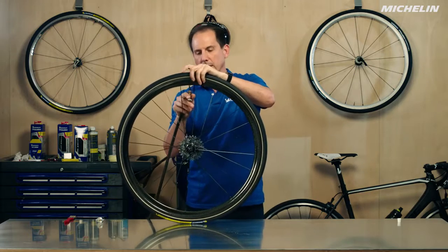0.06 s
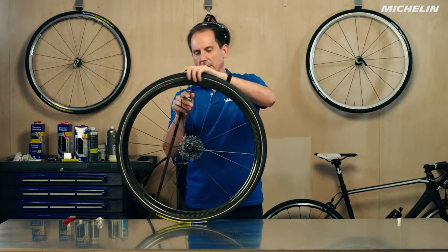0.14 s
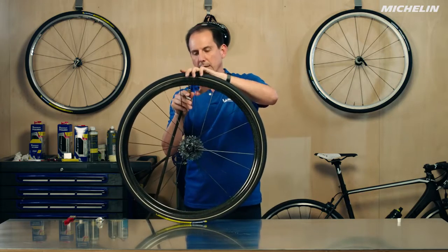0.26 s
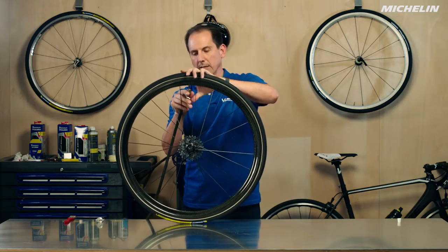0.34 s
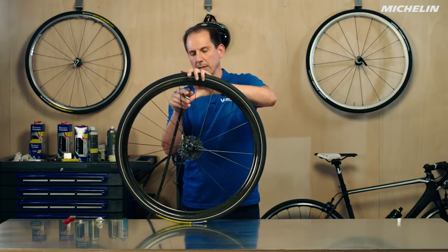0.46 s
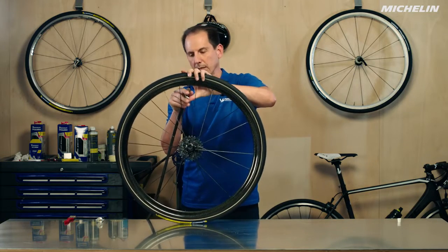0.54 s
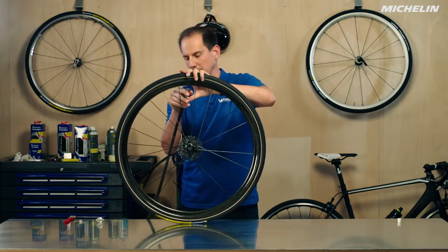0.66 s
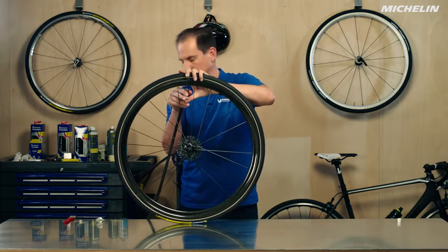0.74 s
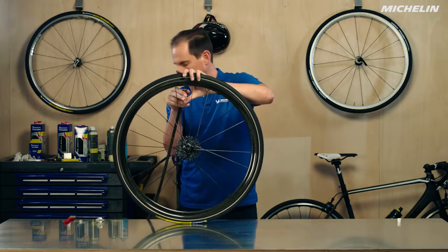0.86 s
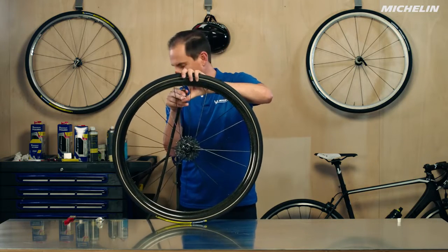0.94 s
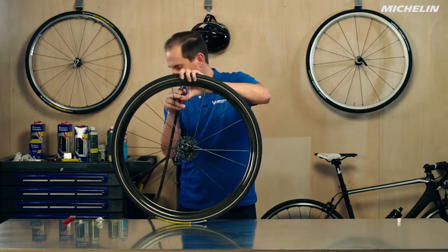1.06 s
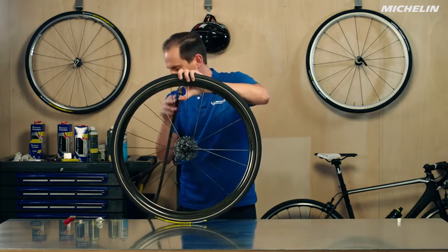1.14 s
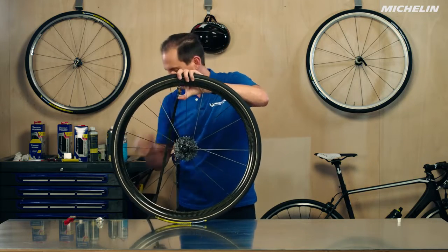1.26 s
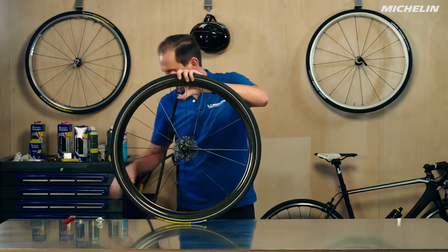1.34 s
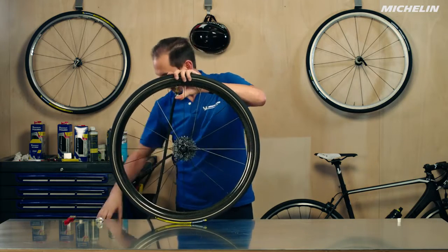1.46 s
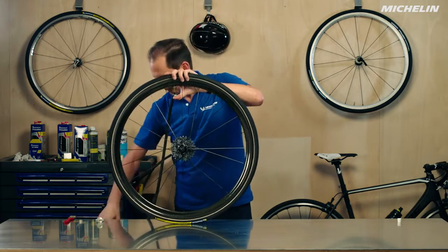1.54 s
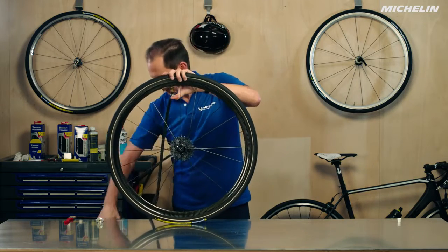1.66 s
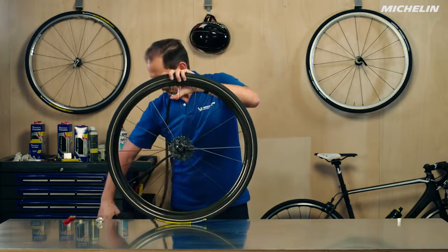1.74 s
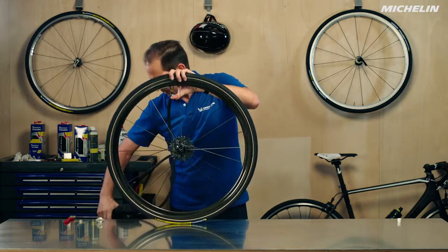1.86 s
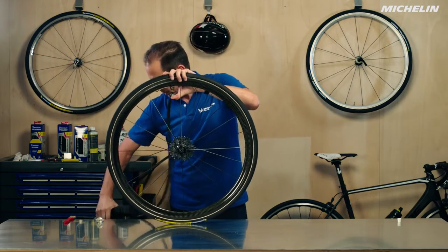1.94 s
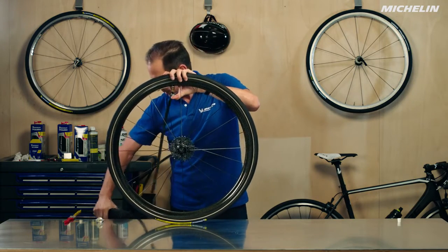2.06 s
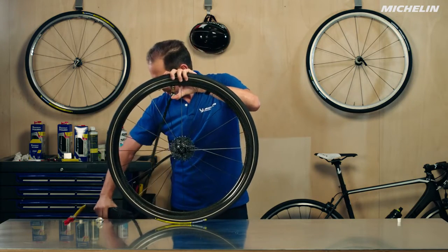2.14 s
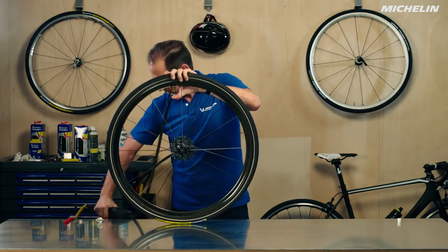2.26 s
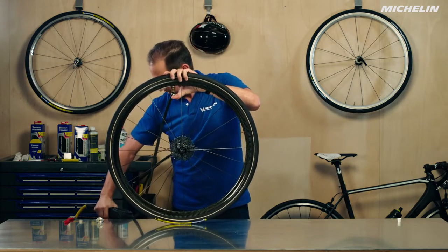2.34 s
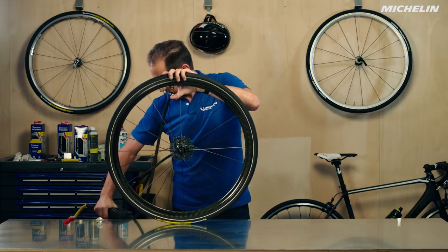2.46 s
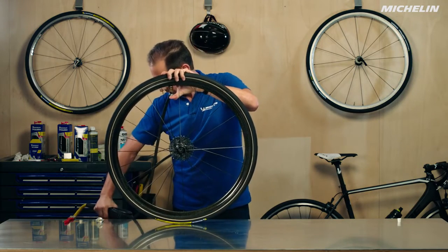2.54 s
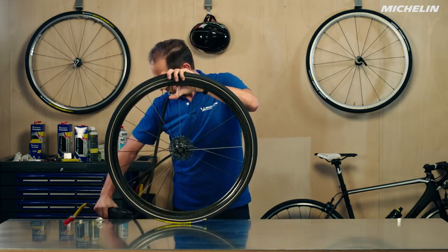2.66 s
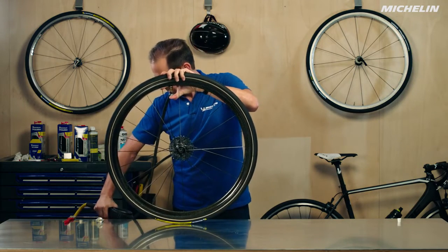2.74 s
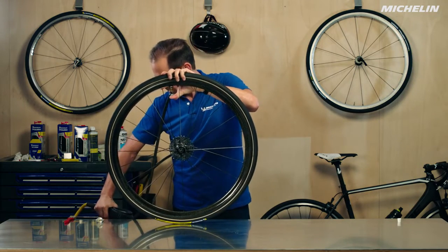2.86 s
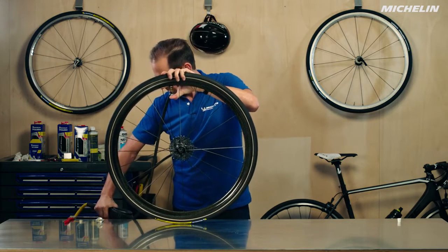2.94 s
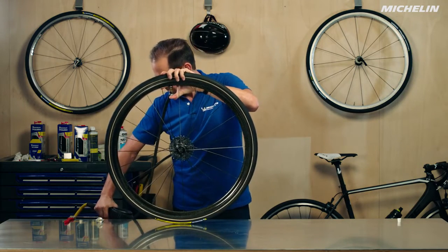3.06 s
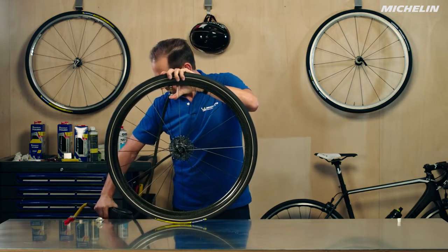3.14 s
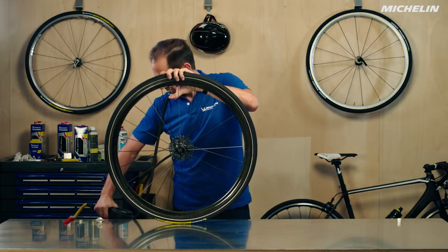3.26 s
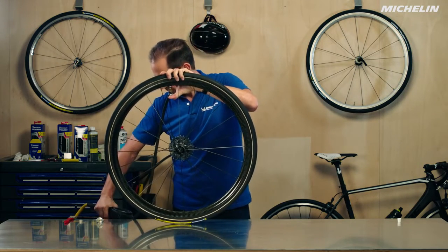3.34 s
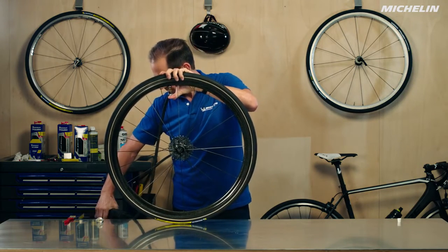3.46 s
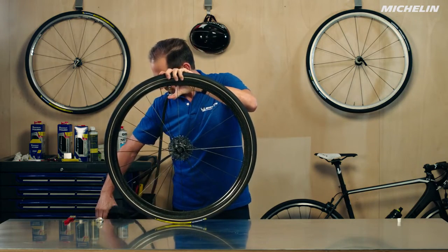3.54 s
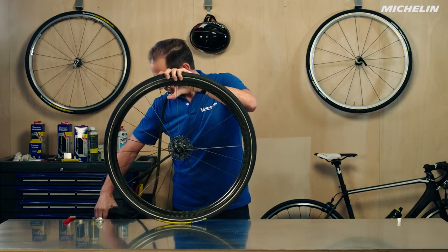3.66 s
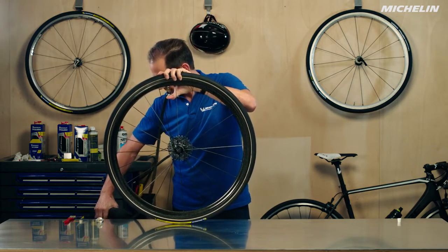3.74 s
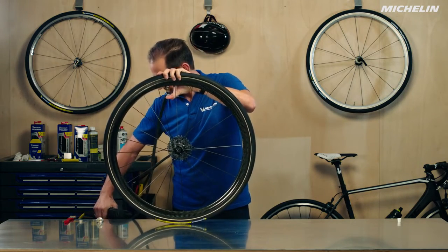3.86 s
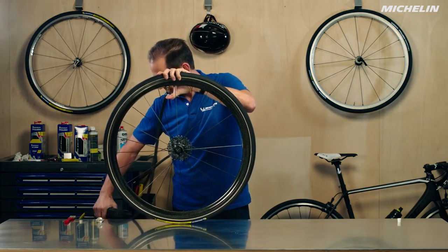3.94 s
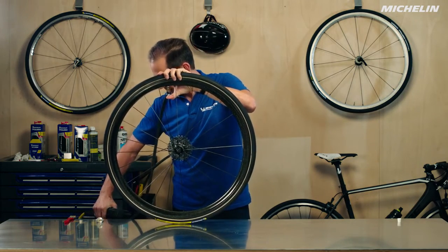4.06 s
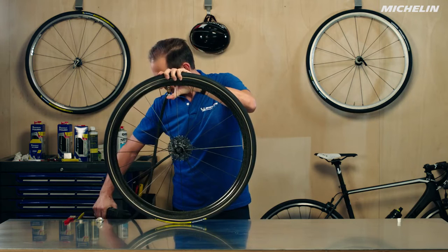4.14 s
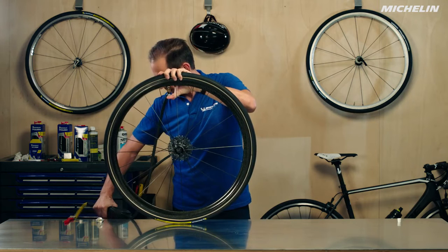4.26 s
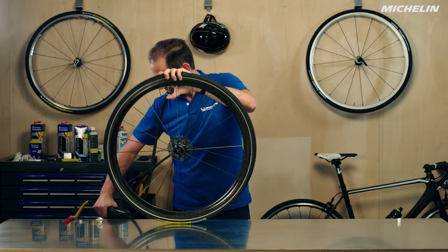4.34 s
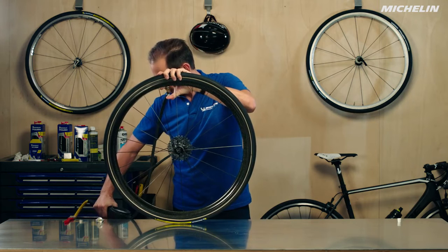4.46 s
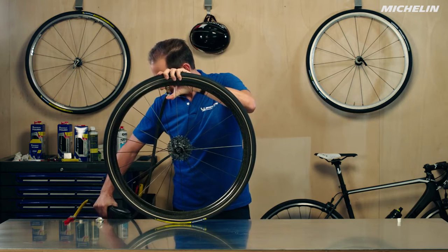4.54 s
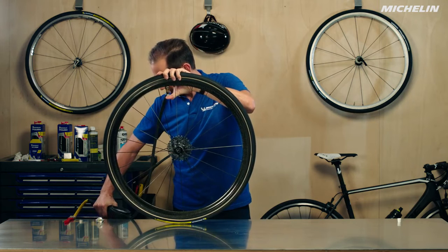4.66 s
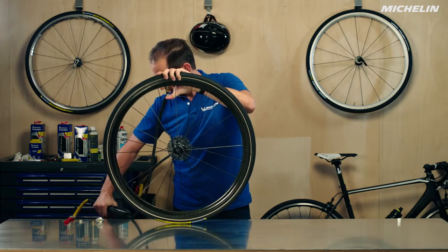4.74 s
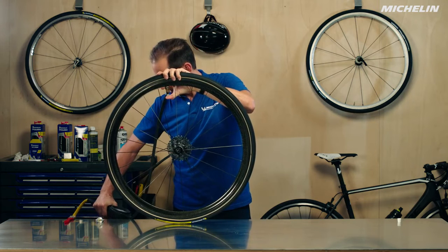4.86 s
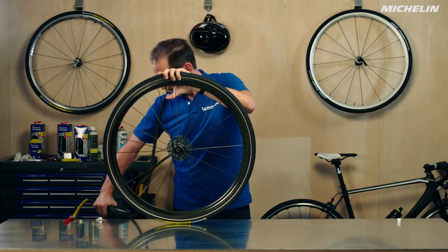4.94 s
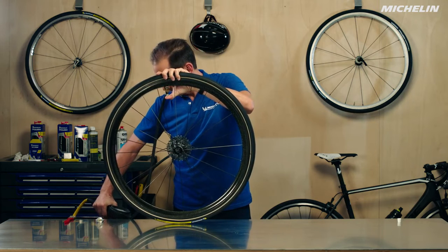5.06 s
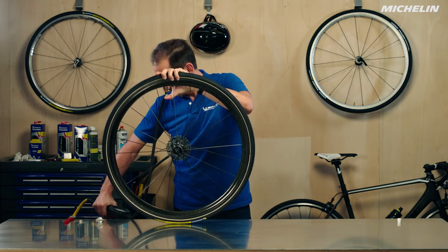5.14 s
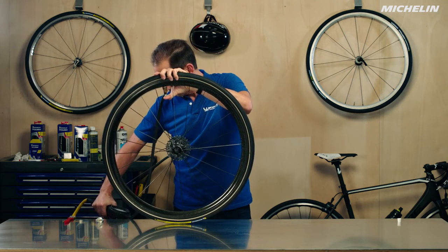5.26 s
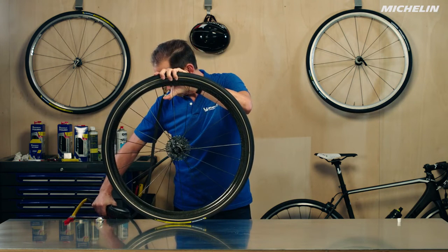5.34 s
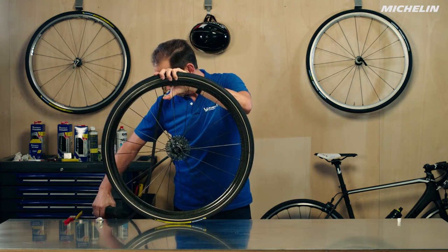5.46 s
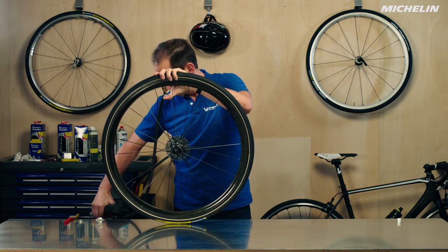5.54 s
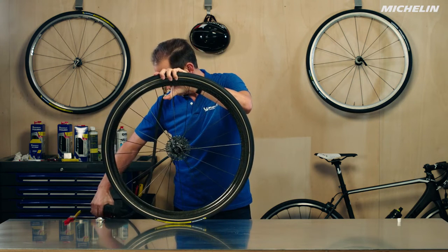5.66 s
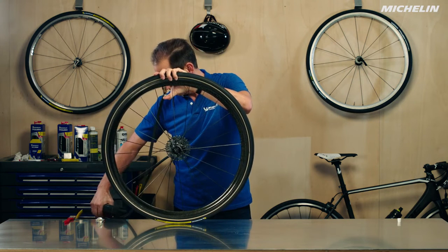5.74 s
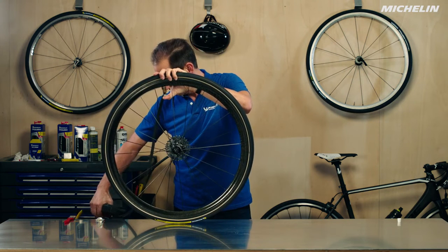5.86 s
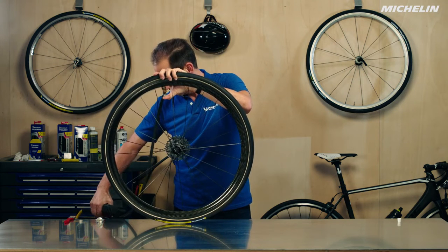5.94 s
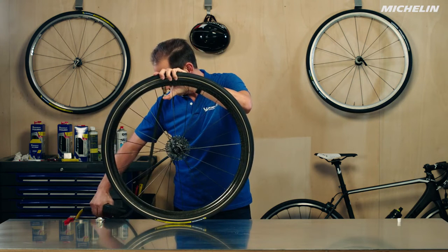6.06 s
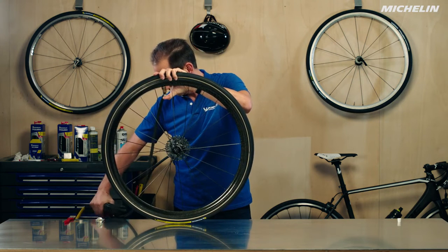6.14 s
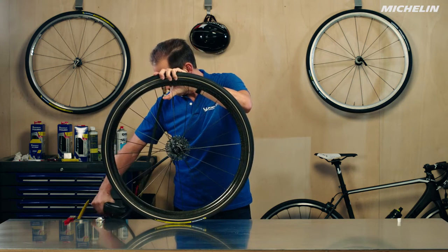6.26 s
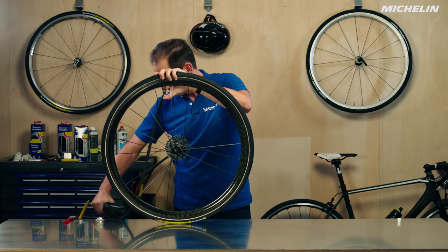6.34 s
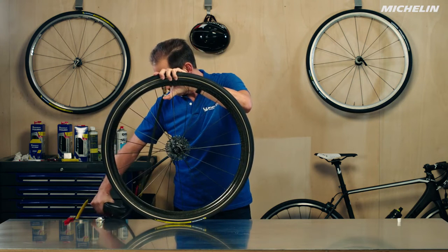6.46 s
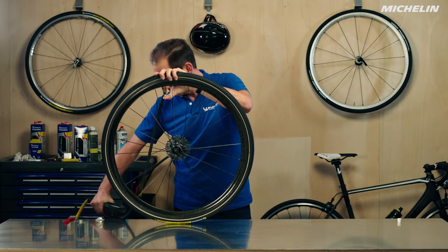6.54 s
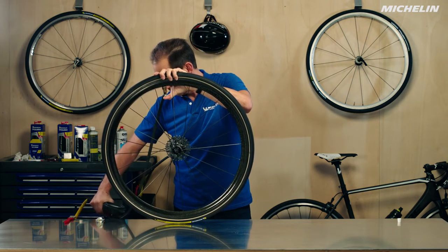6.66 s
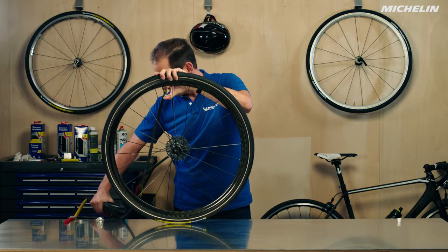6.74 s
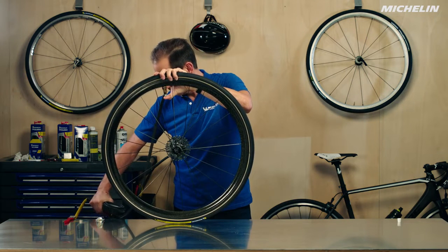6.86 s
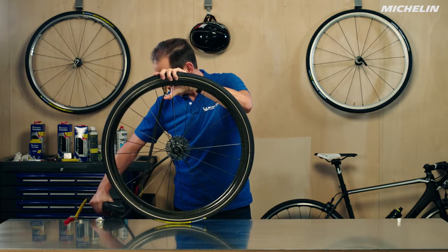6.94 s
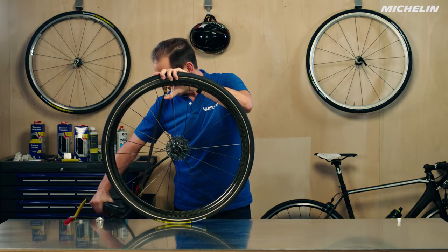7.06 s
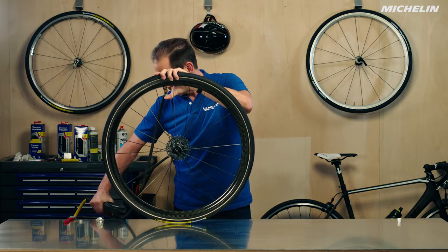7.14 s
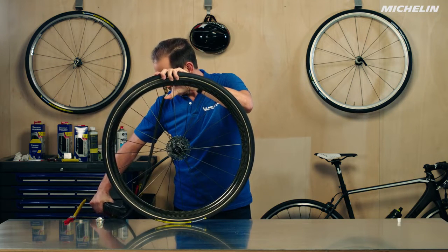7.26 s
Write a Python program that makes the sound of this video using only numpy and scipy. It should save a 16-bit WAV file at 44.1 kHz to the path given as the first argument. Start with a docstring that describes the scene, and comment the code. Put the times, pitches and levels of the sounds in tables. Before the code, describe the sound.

A pump head clicks and scuffs onto a bicycle tyre valve, spitting thin air early on. A short hollow intake and piston knocks lead to a long, bright, hollow rush through the hose. Two stronger intakes follow, each ending in chirps, knocks and a loud pop, then fading hiss. Close single microphone, small quiet workshop with faint hum and rumble.

```python
"""In a small workshop with mains hum and low rumble, turbulence hisses and sputters as a pump goes on a tyre valve.
The struck chuck and its lever tick as damped modes, fingers brush, and the wheel rings faintly. Three pump strokes
follow: each lift draws turbulent air through the resonant barrel, the rod rubs, the seal chirps, the piston knocks.
Each push drives a jet through the hose, a comb of standing waves (long at first, then brief), and the valve pops.
After the second and third pops air hisses through the valve; after the second an edge tone also glides down."""
import sys
import numpy as np
from scipy import signal
from scipy.fft import rfft, irfft
from scipy.io import wavfile
from scipy.ndimage import uniform_filter1d

SR = 44100
rng = np.random.default_rng(int(sys.argv[2]) if len(sys.argv) > 2 else 0)


def bounce(signal):
    """Save signal as a 16-bit WAV file at the path given by the first command-line argument."""
    frames = np.transpose(np.atleast_2d(signal))
    limited = np.clip(frames, -1, 1)
    pcm = np.round(limited * 32767).astype(np.int16)
    wavfile.write(sys.argv[1], SR, pcm)


N = 321797
T = np.arange(N) / SR  # time [s]
HZ = np.fft.rfftfreq(2 ** 19, 1 / SR)  # frequencies of the long spectra [Hz]

# All levels are relative: the gain of each layer and the room act after them.
# Spectra of the rumble and of the still air: (frequency [Hz], level [dB])
RUMBLE_SPECTRUM = [(22, 1), (33, 1.5), (45, -8), (60, -5.5), (80, -16), (120, -23), (250, -28), (500, -43),
                   (900, -65)]
AIR_SPECTRUM = [(70, -3), (130, -13.5), (230, -17), (400, -18.5), (600, -20.5), (1200, -28.5),
                (3000, -37.5), (8000, -41.5), (16000, -44.5)]
# Mains harmonics and one other steady tone: (frequency [Hz], level [dB])
HUM_TONES = [(100, -49), (172, -56.5), (200, -48), (300, -61), (400, -65)]
# Swells of low rumble: (middle [s], half length [s], level [dB])
RUMBLE_SWELLS = [(1.033, 0.12, -45), (2.87, 0.035, -36), (3.62, 0.52, -27), (5.05, 0.25, -32),
                 (6.017, 0.21, -35)]
RUMBLE_REST_DB, RUMBLE_LUMPS_DB = -45.5, 1.7  # level between the swells, and rms unevenness

# Ticks of the chuck and its lever: (time [s], level [dB], treble snap [dB], pitch factor [1])
CHUCK_TICKS = [(0.124, -27.5, 15, 0.92), (0.392, -36, -2, 1.04), (0.572, -28, 3, 0.99), (0.795, -37, 1, .9),
               (1.111, -39, -15, 0.69), (1.142, -32.5, -1, 1.05), (1.16, -27.5, -5, 0.965),
               (2.01, -23, -30, 0.9)]
# Modes of the chuck: (frequency [Hz], level [dB], t60 [s])
CHUCK_MODES = [(1410, -12, 0.036), (1876, 3.5, 0.016), (2150, -2, 0.029), (4400, -11, 0.0087),
               (6500, -21, 0.011)]
# Spectrum of the bright scuff of skin and metal: (frequency [Hz], level [dB])
SCUFF_SPECTRUM = [(700, -22), (1300, -1), (1900, 0), (3500, -3.5), (6800, 7), (10000, -6), (13000, -10),
                  (16000, -16)]

# Air escaping as the chuck goes on: (start [s], length [s], thin hiss [dB], sputter [dB])
CHUCK_LEAKS = [(0.128, 0.129, -25.5, -55), (0.242, 0.06, -19, -36.5)]
# Spectra of the thin hiss and of the sputter: (frequency [Hz], level [dB])
LEAK_SPECTRUM = [(4500, -22), (5800, -14), (6900, -8), (8500, -8.5), (11300, -2.5), (14000, -4),
                 (16000, -1)]
SPUTTER_SPECTRUM = [(400, 2), (700, 4), (1200, 0), (2000, 1), (3000, -5.5), (4500, 1), (6000, -10),
                    (9000, -26), (14000, -29)]
SPUTTER_S = 0.02  # the sputter comes at the end of a leak, as the seal closes

# Fingers brushing chuck and rim: (start [s], length [s], level [dB])
FINGER_BRUSHES = [(0.897, 0.058, -60), (1.137, 0.018, -51), (1.206, 0.051, -56)]
# Faint ring of the wheel: (frequency [Hz], level [dB], t60 [s])
WHEEL_MODES = [(1800, -56, .6), (9500, -63, .45), (12300, -63, .6)]

# Air sucked in on the lifts: (start [s], length [s], level [dB], sag [dB/s], low-pass cutoff [Hz])
LIFT_DRAUGHTS = [(1.663, 0.062, -28, 122, 1410), (1.798, 0.12, -32, 85, 1420), (3.683, 0.67, -28, 74, 4930),
                 (5.67, 0.45, -27, 89, 5000)]
# Spectrum of the intake turbulence: (frequency [Hz], level [dB])
INTAKE_SPECTRUM = [(120, -4), (220, -5.5), (350, -7), (550, -7.5), (900, -11), (1200, -6.5), (1750, -8),
                   (2200, -19.5), (3000, -29.5), (7000, -27), (10000, -36)]
# Resonances of the barrel, then its two longest rings: (frequency [Hz], width [Hz], level [dB])
BARREL_RESONANCES = [(454, 28, -2), (644, 10, 7), (794, 45, 4.5), (880, 25, 0.5), (998, 53, -2),
                     (1350, 160, -3.5)]
BARREL_RINGS = [(866, 19, -3.5), (1017, 12.5, -3.5)]
BARREL_DB, BARREL_SAG_SHARE = -14.5, 0.49  # the barrel's notes outlast the draught
# The barrel also sounds softly as the piston goes down
PUSH_DRAUGHT_DB, PUSH_GROWTH_DB_PER_S, PUSH_NOTES_DB = -52.5, 5.5, -47.5

# The rod sliding: (start [s], length [s], level [dB])
ROD_SLIDES = [(1.669, 0.02, -36.5), (1.819, 0.029, -28), (5.997, 0.059, -44), (6.127, 0.027, -32.5)]
# Spectrum of the rubbing: (frequency [Hz], level [dB])
SLIDE_SPECTRUM = [(400, -17), (650, -11), (840, -6.5), (1100, -5.5), (1300, 0), (1550, -5), (1800, -1),
                  (3000, -6), (4000, -11.5), (6900, -15.5), (15000, -35.5)]
SLIDE_COAST_DB, SLIDE_COAST_S = -12, 0.11  # each slide trails off softly

# The seal slipping: (middle [s], level [dB], mean pitch [Hz], length [s])
SEAL_CHIRPS = [(1.704, -27, 409, 0.011), (1.789, -27, 789, 0.011), (1.812, -23, 824, 0.0082),
               (4.33, -8, 5530, 0.0021), (4.3383, -13, 5410, 0.0058), (6.2547, -10, 5460, 0.0019),
               (6.262, -19.5, 5400, 0.017), (6.272, -10.5, 4650, 0.0018)]
OVERTONE_RATIO, OVERTONE_DB = 1.383, 2  # a hard slip also rings a second mode of the seal

# The piston knocking: (time [s], level [dB], treble snap [dB], pitch factor [1], rebound re knock [dB])
PISTON_KNOCKS = [(2.108, -8.5, -10, 1.18, -22), (2.129, -15, 3, 0.96, -14), (3.548, -15.5, -5, 0.88, -0.5),
                 (4.345, -15, 5, 0.925, -7), (4.39, -12.5, 2, 0.77, -7), (5.524, -15.5, -11, 0.857, -3.5),
                 (5.542, -17, 1, 1.03, -23), (6.27, -18, 9, 0.95, -15)]
# Modes of the piston: (frequency [Hz], level [dB], t60 [s])
PISTON_MODES = [(900, -23, 0.088), (1141, 1.5, 0.028), (1323, -8, 0.029), (1930, -6.5, 0.013),
                (2810, -20, 0.013), (4430, -17, 0.012)]
# Spectrum of the crack of a knock: (frequency [Hz], level [dB])
CRACK_SPECTRUM = [(300, -28), (1000, 3), (3000, 6.5), (5000, 10.5), (6800, 3), (8500, -6), (15000, -20)]
REBOUND_S, REBOUND_SNAP_DB, REBOUND_PITCH = 0.0083, 9, 0.993  # every knock bounces once

# Air rushing into the hose: (start [s], length [s], jet [dB], hollow body of the pump [dB])
HOSE_FILLS = [(2.171, 1.408, -16, -20.5), (4.332, 0.063, -23.5, -27.5), (6.258, 0.028, -24.5, -26.5)]
# Spectra of the jet and of the hollow body: (frequency [Hz], level [dB])
JET_SPECTRUM = [(3500, -15.5), (4600, -7), (5600, -6), (6600, 2.5), (7800, 4.5), (8400, -1), (10100, 0.5),
                (10900, -3), (12400, 2.5), (13100, -8.5), (15800, -5)]
BODY_SPECTRUM = [(500, -24), (750, -29.5), (1000, -6.5), (1500, -3), (2000, 1.5), (2400, 4.5), (2800, 1.5),
                 (3300, 0), (4000, -7.5), (5000, -15), (7000, -41)]
FILL_HOLD_S, FILL_SAG_DB_PER_S = 0.23, 11.5  # the rush holds, then sinks as back pressure builds
HOLLOW_BUILD_S = 0.026  # time constant of the hollow sound swelling in behind the jet
HOSE_HZ = 172.4  # lowest standing wave of a metre of hose

# The tyre valve popping open: (time [s], level [dB], treble snap [dB], pitch factor [1])
VALVE_POPS = [(2.2245, -8.5, 1.5, 0.95), (4.3843, 2, 3, 0.98), (6.305, 3, 2, 1)]
# Modes of the valve: (frequency [Hz], level [dB], t60 [s])
VALVE_MODES = [(824, -15, 0.018), (1151, -10.5, 0.062), (1907, 0.5, 0.029), (2230, -15, 0.015),
               (3240, -12.5, 0.018), (4330, -6.5, 0.013), (12700, -37, 0.024)]
# Spectrum of the air released by a pop: (frequency [Hz], level [dB])
BURST_SPECTRUM = [(550, -41.5), (900, 3), (1450, -9), (2100, 18), (3000, -1.5), (4300, 9), (5500, -3),
                  (8000, -2.5), (15000, -8)]

# Air passing the open tyre valve: (start [s], length [s], level [dB], sag [dB/s])
VALVE_FLOWS = [(4.418, 1.1, -31, 8.5), (6.352, 0.95, -37, 16)]
# Spectrum of that flow: (frequency [Hz], level [dB])
FLOW_SPECTRUM = [(300, -39), (900, -16.5), (1400, -11.5), (2400, -11.5), (3400, -14.5), (4400, -13.5),
                 (5400, -17.5), (6500, -13.5), (10200, -16.5), (14000, -18), (15500, -26.5)]
# Resonances of the valve passage: (frequency [Hz], width [Hz], level [dB])
FLOW_RESONANCES = [(7294, 570, 1.5), (8900, 430, -6.5), (12060, 830, -6)]

# The valve's whistle sinks as the pressure evens out: (time [s], mean pitch [Hz])
WHISTLE_GLIDE = [(4.47, 5100), (4.65, 4900), (4.79, 4680), (5.08, 4320), (5.12, 4170), (5.5, 3830)]
# Partials gliding through a resonance: (multiple [1], level [dB], resonance [Hz], width [Hz])
WHISTLE_MODES = [(1, -46, 4700, 420), (3, -46, 14200, 750), (3, -42, 12350, 650)]

# Reverberation of the room: (frequency [Hz], t60 [s])
ROOM_DECAY = [(200, 1), (1000, 0.69), (2200, 0.63), (5000, 0.51), (8000, 0.4), (15000, 0.13)]
# Reflections from bench, floor and wall: (delay [s], level [dB])
NEAR_ECHOES = [(.0028, -14), (.0046, -15), (.0071, -11), (.0083, -14), (.0118, -21)]
EDGE_HZ = 15900  # upper band limit


def amp(db):
    """Level to amplitude: 20 dB is a factor of ten."""
    return 10 ** (np.asarray(db) / 20)


def evened(x):
    """Normalization to unit root-mean-square."""
    return x / np.sqrt(np.mean(x ** 2) + 1e-20)


def read(points, hz):
    """Linear interpolation of a spectrum over log frequency."""
    f, value = np.transpose(points)
    return np.interp(np.log(hz + 1), np.log(f + 1), value)


def add(mix, s, sound):
    """Superposition: a sound is summed into the mix from time s."""
    part = mix[max(round(s * SR), 0):][:len(sound)]
    part += sound[:len(part)]


def noise(colour, rings=()):
    """Turbulence as filtered white noise: a broad spectrum plus resonances, steeply high-passed below."""
    low_cut = 1 + (0.22 * colour[0][0] / (HZ + 1)) ** 4
    power = amp(read(colour, HZ)) ** 2 / low_cut
    for hz, width, db in rings:
        power = power + amp(db) ** 2 / (1 + ((HZ - hz) / width) ** 2 * 2) ** 2
    white = rng.standard_normal(2 * len(HZ) - 2)
    return evened(irfft(rfft(white) * np.sqrt(power))[:N])


def waver(per_s):
    """Low-pass random fluctuation of unit rms, up to about per_s changes a second."""
    white = rng.standard_normal(N)
    return evened(signal.sosfilt(signal.butter(2, per_s, fs=SR, output="sos"), white))


def gust(start, length, db, rise, fall, sag_db_per_s=0, hold=0):
    """Gain of one rush: exponential onset up to the start, hold, steady sag in dB, exponential decay at the end."""
    t = T - start
    outside = np.maximum(-t, 0) / rise + np.maximum(t - length, 0) / fall
    level = db - sag_db_per_s * np.clip(t - hold, 0, length)
    return amp(level) * np.exp(-np.minimum(outside, 20))


def strikes(events, modes, colour, snap_db, snap_s):
    """Modal impact: each blow excites damped sinusoids and a brief snap of noise."""
    out, t = np.zeros(N), T[:SR // 4]
    snaps = noise(colour)
    for k, (s, db, treble_db, pitch) in enumerate(events):
        detune = pitch * (1 + rng.uniform(-.015, .015, len(modes)))
        ring = np.zeros(len(t))
        for d, (hz, level, t60) in zip(detune, modes):
            ring += amp(level - 60 * t / t60) * np.sin(2 * np.pi * hz * d * t)
        snap = snaps[k * len(t):][:len(t)] * np.exp(-t / snap_s)
        add(out, s, amp(db) * (.5 * ring + amp(snap_db + treble_db) * snap))
    return out


def churn(x, patchy_db):
    """Intermittency of turbulence: patches a few hundred Hz wide and about 0.1 s long rise and fall."""
    z = signal.stft(x, SR, nperseg=512)[2]
    patches = uniform_filter1d(rng.standard_normal(z.shape), size=4, axis=0)  # across frequency
    patches = evened(uniform_filter1d(patches, size=16, axis=1))  # along time
    return evened(signal.istft(z * amp(patchy_db * patches), SR, nperseg=512)[1][:N])


def standing_waves(x, reflection):
    """Repeated reflection along the hose: evenly spaced resonances that blur in the treble."""
    kept = np.clip(reflection, 0, .8) / (1 + (HZ / 2200) ** 2)
    round_trip = kept * np.exp(-2j * np.pi * HZ / HOSE_HZ)
    return evened(irfft(rfft(x, 2 * len(HZ) - 2) / (1 - round_trip))[:N])


def background():
    """Steady sinusoids with slow phase wander for the hum; stationary noise for air and swelling noise for rumble."""
    hum = np.zeros(N)
    for hz, db in HUM_TONES:
        cycles = hz * T + rng.random()
        hum += amp(db) * np.sqrt(2) * np.sin(2 * np.pi * cycles + 0.072 * waver(1.8))
    swell = amp(RUMBLE_REST_DB)
    for s, half, db in RUMBLE_SWELLS:
        swell = swell + amp(db) * np.exp(-((T - s) / half) ** 2)
    rumble = swell * amp(RUMBLE_LUMPS_DB * waver(7)) * noise(RUMBLE_SPECTRUM)
    still_air = amp(-47) * noise(AIR_SPECTRUM)
    return hum + rumble + still_air


def chuck_ticks():
    """Impact excitation of the chuck's short-lived modes, with a bright scuff."""
    return strikes(CHUCK_TICKS, CHUCK_MODES, SCUFF_SPECTRUM, snap_db=-11.0, snap_s=0.0035)


def leak():
    """Turbulent escape: the chuck presses the valve pin before it seals, a thin hiss and then a sputtering spit."""
    hiss, sputter = np.zeros(N), np.zeros(N)
    for s, length, hiss_db, sputter_db in CHUCK_LEAKS:
        hiss += gust(s, length, hiss_db, rise=0.0041, fall=0.0016, sag_db_per_s=26)
        sputter += gust(s + length - SPUTTER_S, SPUTTER_S, sputter_db, rise=0.0089, fall=0.0093)
    escaping = amp(1.5) * hiss * noise(LEAK_SPECTRUM) + sputter * noise(SPUTTER_SPECTRUM)
    return escaping * amp(0.81 * waver(150))


def fingers():
    """Friction noise: skin brushes chuck and rim with a fine, uneven grain."""
    touch = sum(gust(s, length, db, rise=.006, fall=0.012) for s, length, db in FINGER_BRUSHES)
    return amp(-5.5) * touch * noise(SCUFF_SPECTRUM) * amp(1.3 * waver(120))


def wheel(s):
    """Free decay of lightly damped modes, faint and uneven, once the lever is locked at time s."""
    t = np.maximum(T - s, 0)
    ring = np.zeros(N)
    for hz, db, t60 in WHEEL_MODES:
        ring += amp(db - 60 * t / t60 + 3 * waver(40)) * np.sin(2 * np.pi * hz * t)
    return ring


def lift():
    """Turbulence exciting resonators: air rings barrel and hose, strongly on lifts and softly while the hose fills."""
    draught = standing_waves(noise(INTAKE_SPECTRUM, BARREL_RESONANCES), reflection=0.27)
    draught = draught * amp(0.88 * waver(116))
    notes = np.zeros(N)
    for hz, width, db in BARREL_RINGS:
        notes += amp(db) * waver(width / 2) * np.sin(2 * np.pi * hz * T)
    notes = evened(notes)
    out = np.zeros(N)
    for s, length, db, sag, cutoff_hz in LIFT_DRAUGHTS:
        muffled = signal.sosfilt(signal.butter(2, cutoff_hz, fs=SR, output="sos"), draught)
        out += muffled * gust(s, length, db, rise=0.0028, fall=0.027, sag_db_per_s=sag)
        notes_sag = sag * BARREL_SAG_SHARE
        out += notes * gust(s, length, db + BARREL_DB, rise=0.003, fall=0.04, sag_db_per_s=notes_sag)
    for s, length, _, _ in HOSE_FILLS:
        growth = -PUSH_GROWTH_DB_PER_S  # a negative sag swells
        out += draught * gust(s, length, PUSH_DRAUGHT_DB, rise=0.005, fall=0.18, sag_db_per_s=growth)
        out += notes * gust(s, length, PUSH_NOTES_DB, rise=0.005, fall=0.074)
    return out


def rod():
    """Sliding friction: the rod rubs with a fine grain, then coasts."""
    rub = np.zeros(N)
    for s, length, db in ROD_SLIDES:
        rub += gust(s, length, db, rise=0.0069, fall=0.0054)
        rub += gust(s, length, db + SLIDE_COAST_DB, rise=0.0045, fall=SLIDE_COAST_S)
    return amp(-3.5) * rub * noise(SLIDE_SPECTRUM) * amp(1.3 * waver(210))


def chirps():
    """Stick-slip: the rubber seal squeals briefly; the loudest slips ring an overtone and spit a little air."""
    out, spit = np.zeros(N), np.zeros(N)
    t = np.arange(-SR // 30, SR // 30) / SR
    jitter = .015 * waver(1500)
    for k, (s, db, hz, length) in enumerate(SEAL_CHIRPS):
        swell = amp(db) * np.exp(-(2 * t / length) ** 2)
        pitch = hz * (1 + jitter[k * len(t):][:len(t)])
        phase = 2 * np.pi * np.cumsum(pitch) / SR
        # the squared swell favours the hard slips
        overtone = amp(OVERTONE_DB) * swell ** 2 * np.sin(OVERTONE_RATIO * phase)
        add(out, s + t[0], swell * np.sin(phase) + overtone)
        add(spit, s + t[0], swell ** 2)
    return out + amp(-14) * spit * noise(JET_SPECTRUM)


def knocks():
    """Impact and rebound: the piston hits its stop, ringing its modes, and bounces once."""
    blows, rebounds = [], []
    for s, db, snap_db, pitch, rebound_db in PISTON_KNOCKS:
        blows.append((s, db, snap_db, pitch))
        rebounds.append((s + REBOUND_S, db + rebound_db, REBOUND_SNAP_DB, REBOUND_PITCH))
    return strikes(blows + rebounds, PISTON_MODES, CRACK_SPECTRUM, snap_db=-10.0, snap_s=0.0032)


def hose():
    """Jet noise and pipe resonance: a jet through the check valve sounds the hollow of the hose beneath it."""
    jet, body = np.zeros(N), np.zeros(N)
    for s, length, jet_db, body_db in HOSE_FILLS:
        rush = gust(s, length, 0, rise=0.0011, fall=0.022, sag_db_per_s=FILL_SAG_DB_PER_S, hold=FILL_HOLD_S)
        build = 1 - np.exp(-np.maximum(T - s, 0) / HOLLOW_BUILD_S)
        jet += amp(jet_db) * rush * amp(7.4 * (build - 1))
        body += amp(body_db) * rush * build ** 2
    hollow = standing_waves(noise(BODY_SPECTRUM), reflection=0.49)
    jet_sound = amp(-1.5) * jet * churn(noise(JET_SPECTRUM), patchy_db=2.5)
    hollow_sound = amp(-2.5) * body * churn(hollow, patchy_db=2.0)
    return (jet_sound + hollow_sound) * amp(0.24 * waver(60))


def valve_pops():
    """Sudden release: the opening valve rings its modes and lets out a burst of air."""
    return strikes(VALVE_POPS, VALVE_MODES, BURST_SPECTRUM, snap_db=-4, snap_s=.0028)


def valve_flow():
    """Turbulent flow in a narrow resonant passage, fading as the pressure evens out."""
    flow = sum(gust(s, length, db, rise=0.024, fall=.012, sag_db_per_s=sag) for s, length, db, sag in VALVE_FLOWS)
    return amp(1.5) * flow * noise(FLOW_SPECTRUM, FLOW_RESONANCES) * amp(.5 * waver(45))


def whistle():
    """Edge tone: an unsteady gliding pitch whose partials swell as they cross fixed resonances."""
    s, pitch = np.transpose(WHISTLE_GLIDE)
    hz = np.interp(T, s, pitch)
    wobble = 1 + .009 * waver(400) + .003 * waver(12)
    flicker = amp(2.5 * waver(40) + 2 * waver(9))
    phase = 2 * np.pi * np.cumsum(hz * wobble) / SR
    tone = np.zeros(N)
    for k, db, centre, width in WHISTLE_MODES:
        resonance = 1 / (1 + ((k * hz - centre) / width) ** 4)
        tone += amp(db) * np.sin(k * phase) * resonance
    return gust(s[0], s[-1] - s[0], 0, rise=0.027, fall=.01) * tone * flicker


def workshop(x, wet_db, echo_db):
    """Room response by convolution: direct sound, near echoes, and a diffuse tail whose treble dies first."""
    hz, t, z = signal.stft(rng.standard_normal(SR), SR, nperseg=256)
    decay = amp(-60 * t / read(ROOM_DECAY, hz)[:, None])
    tail = signal.istft(z * decay, SR, nperseg=256)[1][:SR]
    tail = tail * (1 - np.exp(-T[:len(tail)] / 0.0023))
    response = amp(wet_db) * tail / np.linalg.norm(tail)
    response[0] += 1  # direct sound
    for delay, db in NEAR_ECHOES:
        response[round(delay * SR)] += amp(db + echo_db)
    return signal.fftconvolve(x, response / np.linalg.norm(response))[:N]


def scene():
    """Superposition at one microphone: wheel, valve and pump each sound into the room, over the background."""
    at_wheel = chuck_ticks() + leak() + fingers() + wheel(s=1.17)
    at_pump = lift() + rod() + chirps() + knocks() + hose()
    at_valve = valve_pops() + valve_flow() + whistle()
    mono = background()
    mono += workshop(at_wheel, wet_db=-10, echo_db=-6)
    mono += workshop(at_pump, wet_db=-8.5, echo_db=-8.0)
    mono += workshop(at_valve, wet_db=-10.5, echo_db=-2.5)
    return np.array([mono, mono])


def record(dry):
    """Overload and band limit: peaks beyond full scale are clipped, then a low-pass removes the top treble."""
    clipped = np.clip(dry, -1, 1)
    low_pass = signal.firwin(511, EDGE_HZ, window=("kaiser", 9), fs=SR)
    return signal.oaconvolve(clipped, low_pass[None], "same")


dry = scene()
out = record(dry)
bounce(out)
```